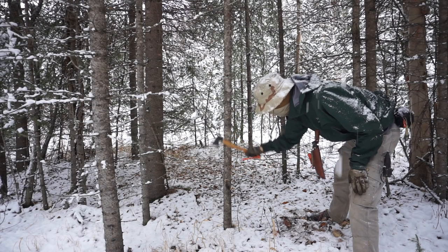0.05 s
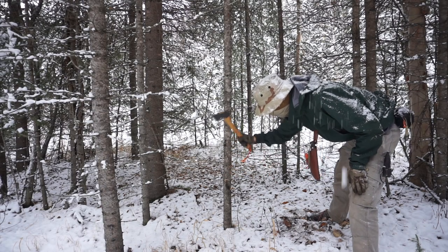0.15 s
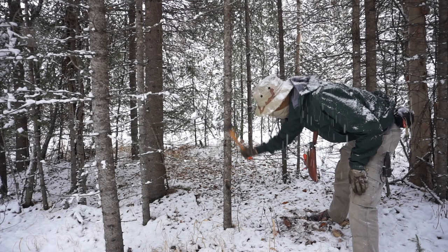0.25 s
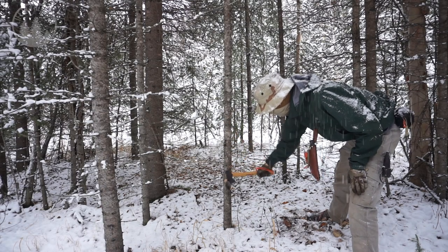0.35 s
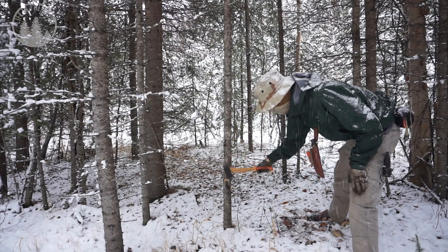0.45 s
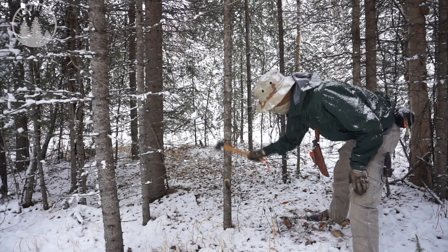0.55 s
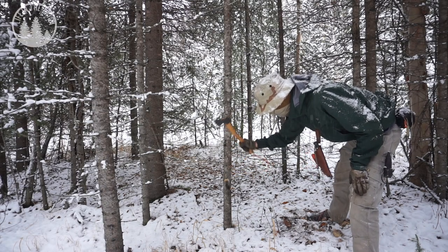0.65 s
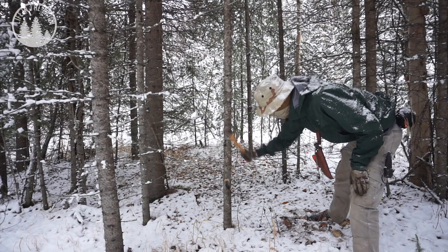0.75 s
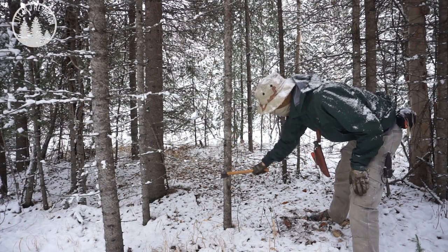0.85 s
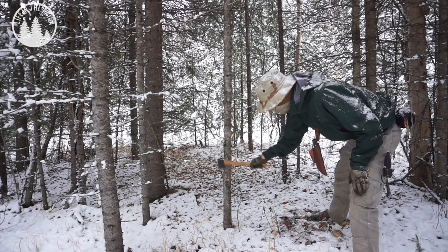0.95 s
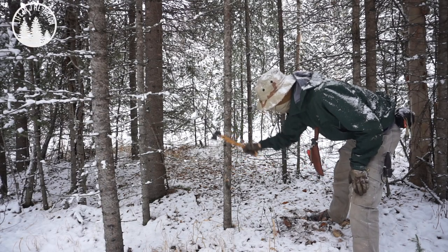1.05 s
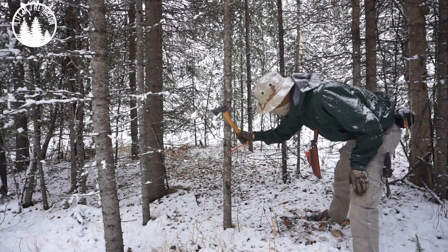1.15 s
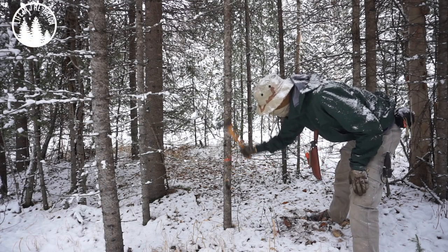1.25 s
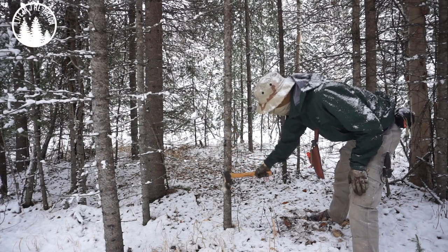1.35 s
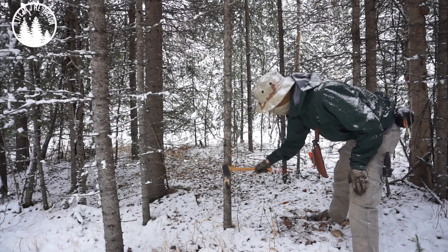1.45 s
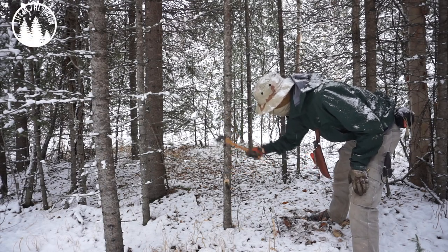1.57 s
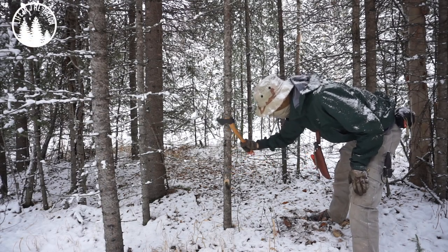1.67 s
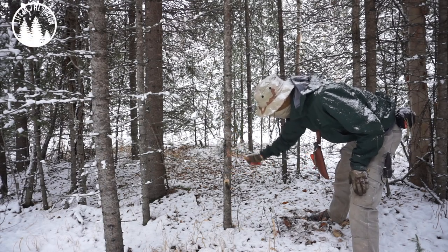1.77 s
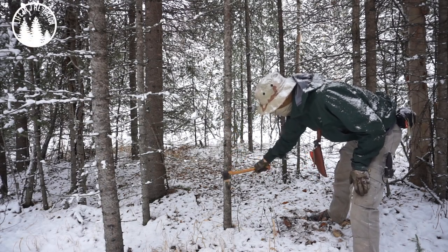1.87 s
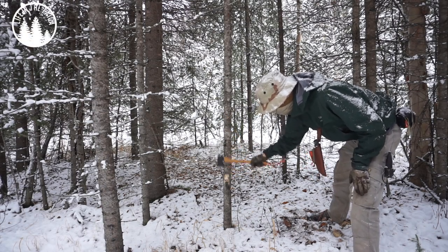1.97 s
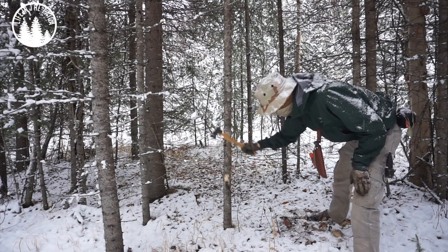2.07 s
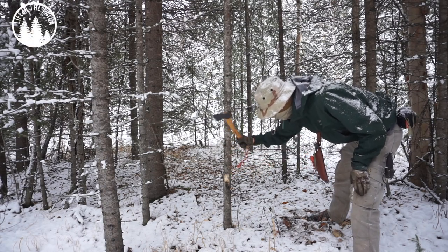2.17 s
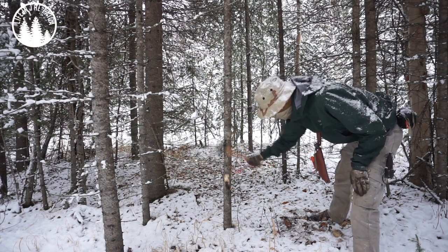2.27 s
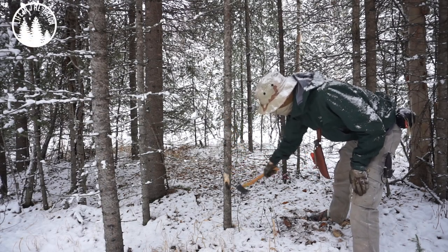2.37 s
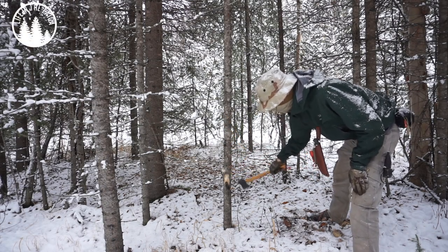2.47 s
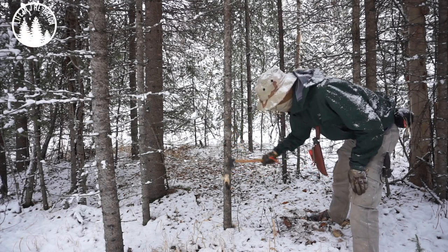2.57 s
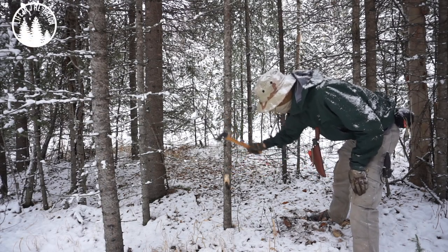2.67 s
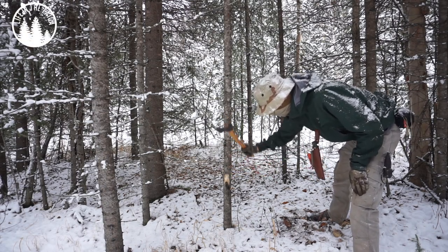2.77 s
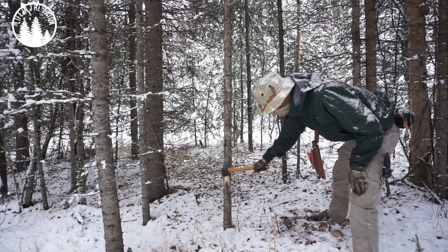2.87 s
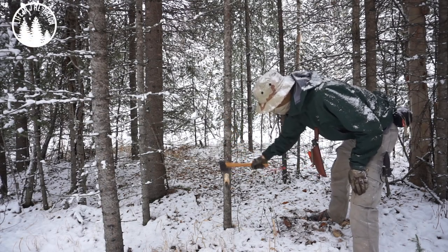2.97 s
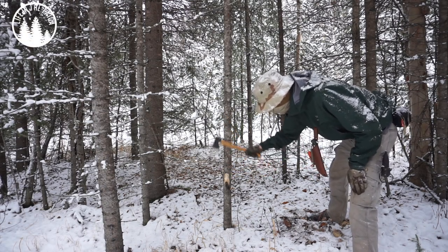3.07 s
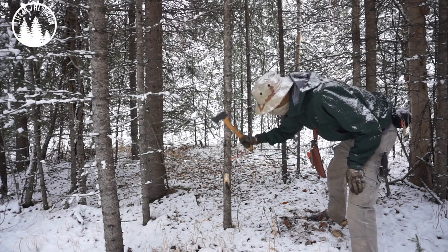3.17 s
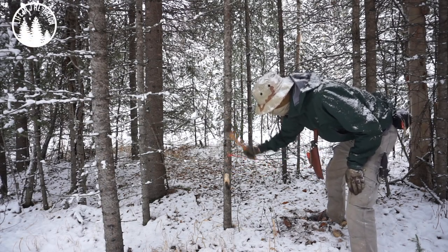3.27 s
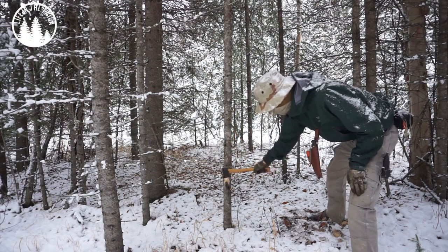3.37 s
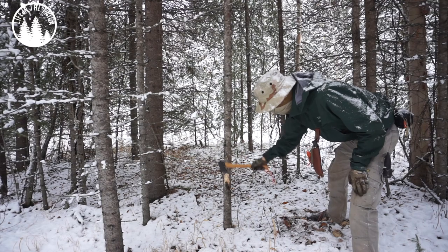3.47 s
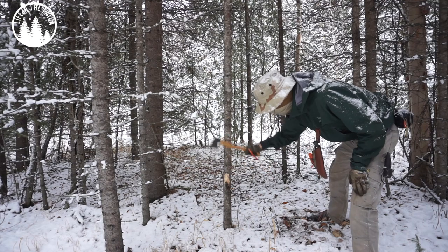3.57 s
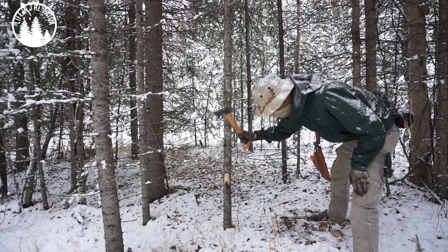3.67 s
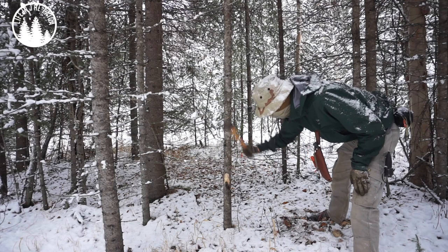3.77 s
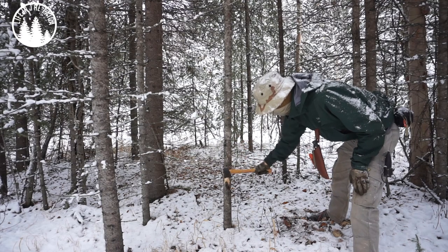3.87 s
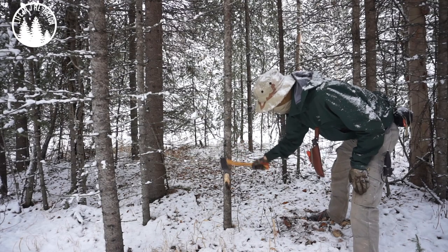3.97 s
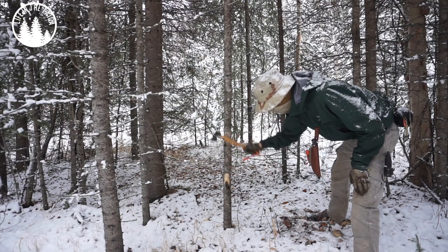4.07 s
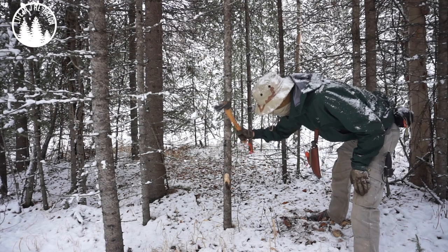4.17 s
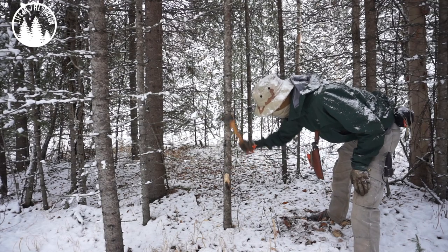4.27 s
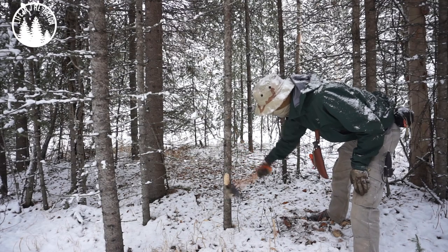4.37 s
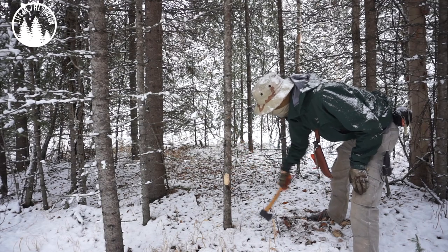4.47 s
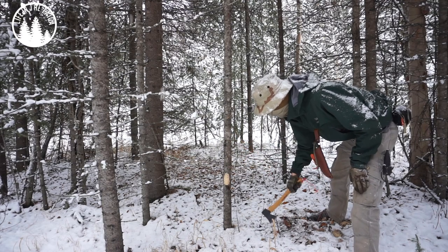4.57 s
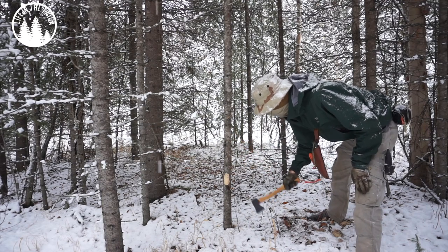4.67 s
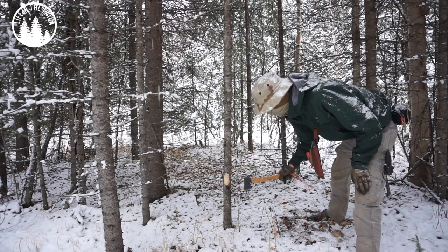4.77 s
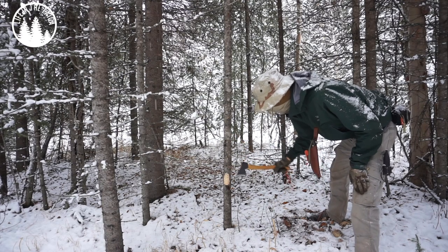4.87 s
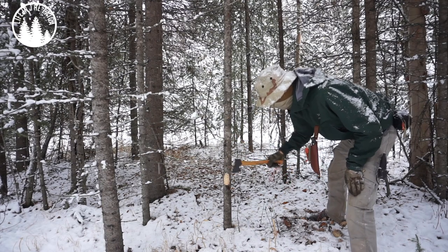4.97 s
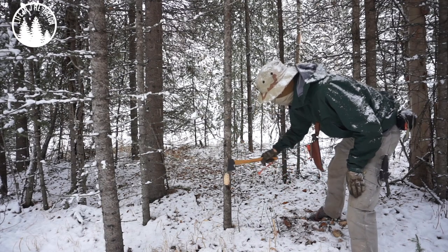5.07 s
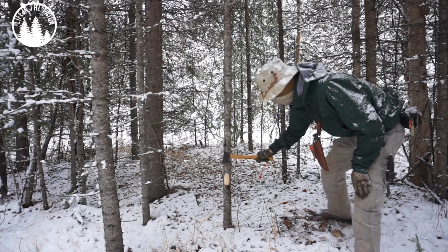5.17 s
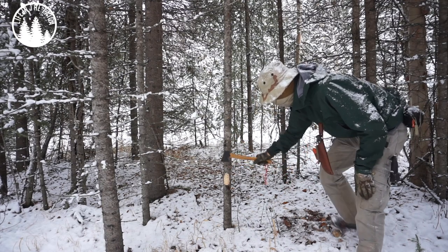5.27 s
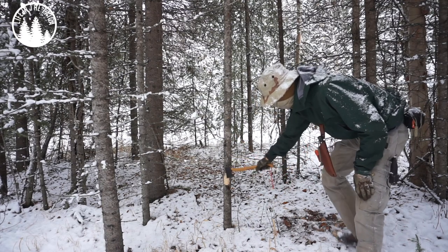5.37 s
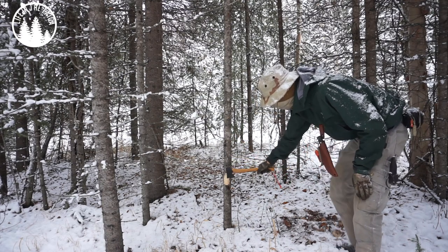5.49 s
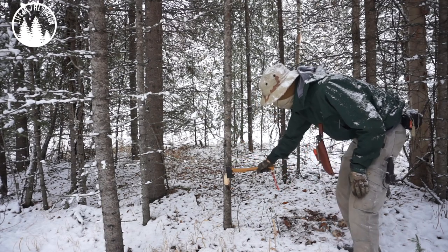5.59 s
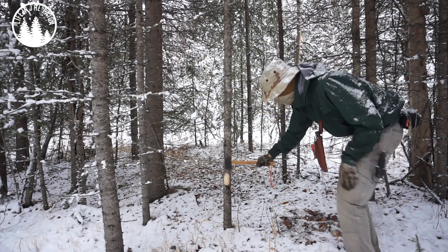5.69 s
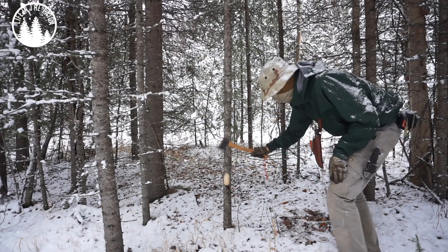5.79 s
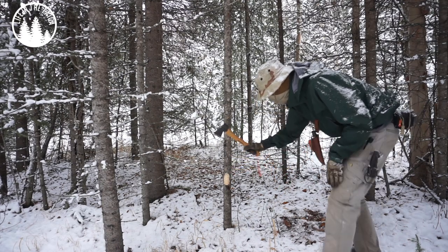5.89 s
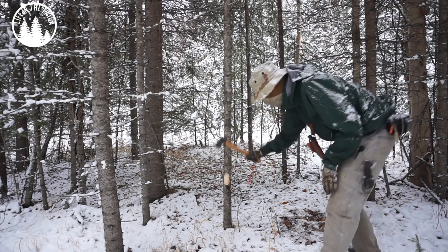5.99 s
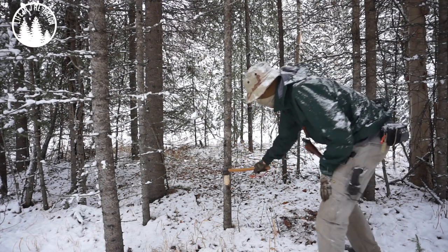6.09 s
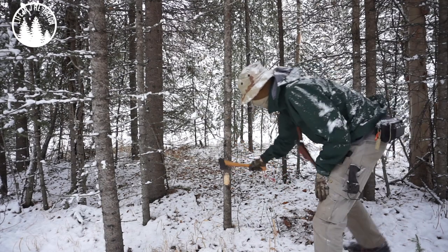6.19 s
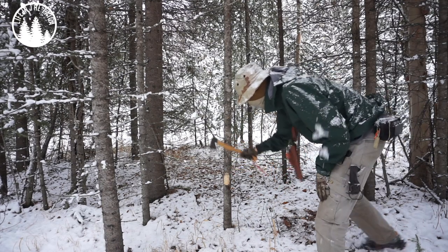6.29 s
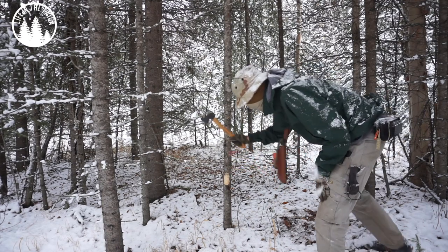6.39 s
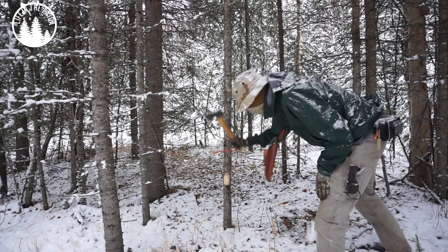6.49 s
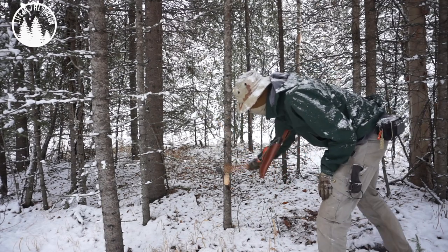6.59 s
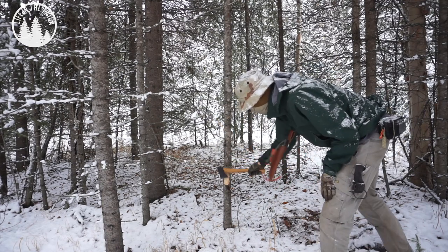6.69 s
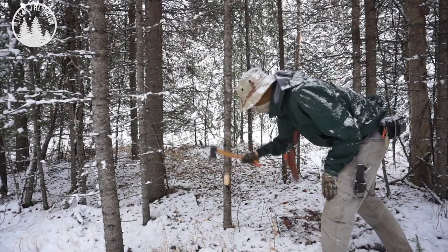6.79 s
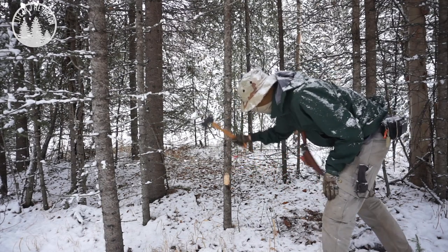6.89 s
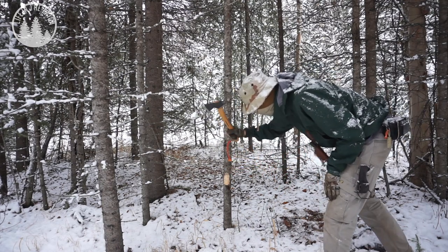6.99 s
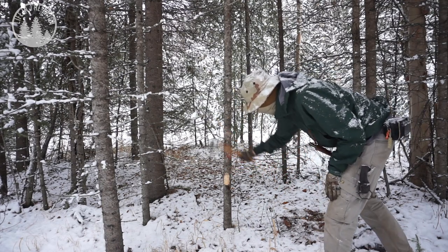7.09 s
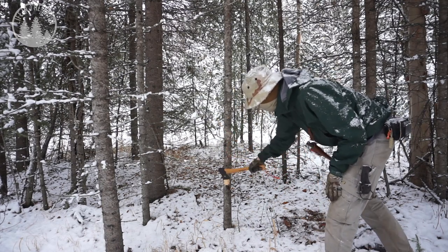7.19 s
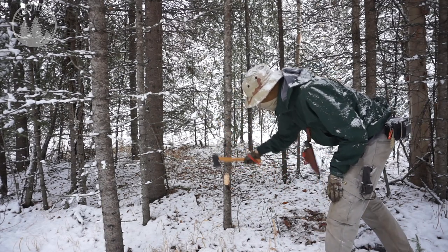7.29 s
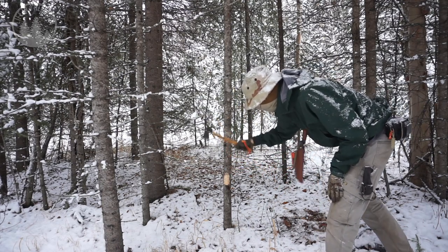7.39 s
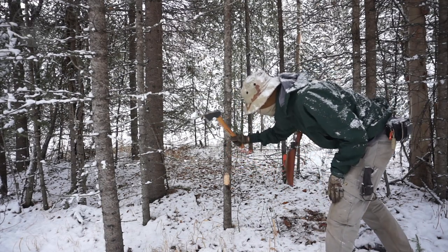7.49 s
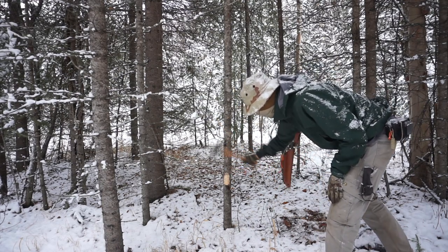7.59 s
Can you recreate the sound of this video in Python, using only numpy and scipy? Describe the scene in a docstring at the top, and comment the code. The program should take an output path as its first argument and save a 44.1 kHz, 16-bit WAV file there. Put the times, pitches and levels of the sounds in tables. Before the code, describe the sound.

Close stereo pickup of outdoor chopping: ten steady, sharp hatchet hits on a slender standing tree, splintering and knocking, each answered by a short wide echo from the trees. Light sleeve rubs and tiny falling chips fill the gaps above quiet distant water. The rhythm then breaks for cloth rustle, a glancing scrape-like crack and dull footfalls in snow, before three slower, firm blows finish.

```python
"""In a snowy forest, a hatchet chops a thin standing trunk about twice a second, with a river far off.
Each blow tears fibres, rings the wood and steel and shakes the stem; then the trees echo it.
Chips tick down after each blow, and the sleeve rubs before it and sometimes after it.
Past 4.5 s the blows come more slowly: one skids along the trunk while the jacket rustles and boots
thud and crunch in the snow, then three more bite. The wood is filtered crackle, the river is noise."""
import sys
import numpy as np
from scipy import signal
from scipy.fft import rfft, irfft
from scipy.io import wavfile
from scipy.ndimage import uniform_filter1d

SR = 44100
rng = np.random.default_rng(int(sys.argv[2]) if len(sys.argv) > 2 else 0)


def transcribe(u):
    """Save the signal u as a 16-bit wav file named by the first command-line argument.

    u: samples, shape (n,) or (channels, n), limited to [-1, 1]; the rate is SR.
    q: integer samples, one column per channel.
    """
    v = np.clip(np.atleast_2d(u).T, -1, 1)
    q = np.round(v * 32767).astype(np.int16)
    wavfile.write(sys.argv[1], SR, q)


N = 336924  # length of the scene in samples
HZ = np.fft.rfftfreq(4096, 1 / SR)  # frequencies on which filters are drawn
T = np.arange(SR // 2) / SR  # half a second of time, for short sounds

# Bites of the blade. Each row: start in seconds, length in seconds, strength in dB, woody knock in dB
# over the strength, edge brightness in dB over the strength, main splinter in Hz, its lift in dB,
# lesser splinter in Hz, stem shake in dB.
CHOPS = [ (-.085, 0.0035, 6, -7, -4, 3800, 6, 2210, -1.5),
         (.4185, 0.0059, 8, -11.5, -0.5, 4150, 7, 2400, -1),
         (.9150, .0041, 5.5, 0, -1.5, 2045, 11, 2960, -1.5),
         (1.4190, 0.0022, 0.5, 3, 4.5, 2870, 12, 5000, 1.5),
         (1.4252, 0.0052, 4.5, 1.5, 3, 3050, 16, 1080, 4), (1.9030, 0.0033, 6.5, 0, 0, 2090, 10, 940, -2),
         (2.4043, .0026, 6.5, -1.5, 1, 3250, 5.5, 1720, -7), (2.4102, .0038, -5, 3, 1.5, 5960, 12, 1110, 0),
         (2.9567, 0.0046, 5, -2.5, -0.5, 1380, 10, 3340, -4.5),
         (3.4356, .0057, 4.5, 2, -0.5, 3330, 7, 1130, -.5),
         (3.9386, 0.00297, 6.5, -1, -1.5, 2700, 8.5, 1500, -.5),
         (4.443, 0.0094, 8.5, 0.5, 1.5, 2900, 7.5, 1000, -4), (5.4618, .018, -2, 8, 11.5, 3030, 19, 653, 0),
         (6.1523, .0042, 4.5, 1, 3, 3530, 14.5, 940, 0), (6.7011, 0.003, 4.5, 2.5, -2, 9460, 14.5, 1250, 3),
         (7.232, 0.0049, 8, -4, -6.5, 4200, 2, 1590, 1)]
# Resonances of the notch in the trunk. Each row: pitch in Hz, width in Hz, lift in dB.
NOTCH = [(226, 140, 12), (412, 120, 9), (547, 55, 5), (784, 104, 10.5), (918, 63, 7), (1103, 85, 6.5),
         (1240, 54, 6), (1557, 51, 6.5), (1880, 300, 5), (2230, 116, 6), (3400, 110, 0)]
# Basic tone of a bite. Each row: frequency in Hz, level in dB.
BITE_TONE = [(40, -14), (130, -12.5), (320, -19), (600, -1.5), (900, -4), (2000, -4), (4000, 1.5),
             (6000, -3.5), (10000, -2.5), (15000, -4.5)]
# Bending of the whole stem. Each row: pitch in Hz, level in dB before the blow's stem shake,
# time to fade by 60 dB in seconds.
STEM = [(50.7, -38, 0.45), (61, -50.5, .3), (72.7, -44.5, 0.64), (92, -46.5, 0.17), (93.9, -37.5, 0.41),
        (115.5, -49.5, 0.52), (121.4, -56.5, 0.27), (145.4, -50.5, 0.34), (206.5, -38.5, 0.056),
        (246, -44.5, 0.11)]
# Ringing of the steel head. Each row: pitch in Hz, level in dB before the blow's steel level,
# time to fade by 60 dB in seconds.
STEEL = [(4100, -19, .05), (5770, -8, 0.17), (7160, -19, 0.2), (10000, 1, 0.12), (11050, -20, .1),
         (12285, -13, 0.19)]
# How long the forest echoes. Each row: frequency in Hz, time to fade by 60 dB in seconds.
FOREST_T60 = [(100, .3), (500, 0.55), (1500, 0.66), (3500, 0.52), (7000, 0.49), (15000, 0.6)]
# Tone of the forest echo. Each row: frequency in Hz, relative level in dB.
FOREST_TONE = [(100, 19), (350, -16.5), (800, -5), (1500, 0), (3500, -4.5), (7000, -3.5), (15000, -4)]
# How alike the echo is on both sides. Each row: frequency in Hz, left-right likeness (1 is the same).
FOREST_SAME = [(200, 1), (600, 1), (1200, 0.61), (2200, 0.31), (6000, 0.027), (15000, 0.064)]
# Where nearby sounds sit. Each row: frequency in Hz, left level minus right level in dB.
NEAR_PAN = [(200, -0.9), (1200, -4.5), (2300, -5), (3400, -3), (4500, -1), (6000, 2), (9000, -0.5),
            (15000, 0)]
# How alike nearby sounds are on both sides. Each row: frequency in Hz, left-right likeness.
NEAR_SAME = [(200, 1), (1500, 0.86), (4000, 0.91), (8000, 0.9), (15000, .86)]
# Loudest ticks of chips, twigs and the blade working loose. Each row: start in seconds,
# starting level in dB, fade in seconds, centre in Hz.
TICKS = [(0.892, -42.5, .0026, 1390), (0.968, -29, 0.0012, 5400), (1.609, -40.5, 0.0039, 3920),
         (1.6536, -36, 0.011, 3530), (1.7232, -42, 0.022, 3915), (1.938, -27.5, 0.0023, 5000),
         (2.01, -30, 0.0014, 5030), (2.1503, -38.5, 0.0052, 3260), (2.2857, -33, 0.0043, 3400),
         (2.526, -39.5, 0.0079, 6000), (3.0605, -39.5, 0.014, 3950), (3.9024, -35, 0.002, 2410),
         (4.144, -38, 0.0038, 6200), (4.562, -38.5, 0.009, 5400), (4.624, -42, 0.02, 4940),
         (5.321, -38, .015, 4100), (5.7348, -29, 0.0033, 1400), (5.7716, -53, .002, 2530),
         (7.305, -29, 0.0021, 3580)]
# Dull thuds of boots and swinging gear. Each row: start in seconds, level in dB,
# snow crunch in dB over that level, centre in Hz.
THUDS = [(5.472, -49.5, 9.5, 184), (5.603, -48, 2, 152), (5.643, -49, -1.5, 120), (5.737, -32.5, -2, 121),
         (5.773, -43, 2, 230), (6.094, -33.5, -4, 200), (6.122, -40, 4.5, 253), (6.25, -45.5, 4, 188),
         (6.565, -42, -5, 234), (6.589, -43, -5, 119), (7.106, -36.5, -10.5, 101), (7.157, -39, -8.5, 141),
         (7.548, -35.5, -9, 114)]
# Tone of rubbing cloth. Each row: frequency in Hz, relative level in dB.
CLOTH = [(200, -50), (700, 1), (1500, -2.5), (3300, 4.5), (5000, 1.5), (7000, -2), (11000, -3), (15000, -1)]
# Tone of crunching snow. Each row: frequency in Hz, relative level in dB.
SNOW = [(30, -17), (80, -3), (250, 0.5), (600, -1), (1200, -13.5), (3000, -13), (15000, -56)]
# The jacket rubs as the body rises and takes two steps: one curve a move.
# Each row of a curve: time in seconds, level of the hiss in dB before MOVE_DB.
MOVES = [
    [(5.14, -58.5), (5.254, -39), (5.27, -45.5), (5.312, -47.5), (5.322, -39), (5.358, -47), (5.45, -50)],
    [(5.52, -59), (5.558, -43), (5.674, -65), (5.744, -48), (6.002, -54.5), (6.08, -41.5), (6.14, -46)],
    [(6.22, -52.5), (6.398, -51.5), (6.488, -44), (6.518, -44.5), (6.524, -48.5), (6.672, -62.5),
     (6.69, -53)],
]
# The sleeve rubs as the arm pulls back. Each row: peak time in seconds, level in dB.
TUGS = [(1.668, -45.5), (2.18, -49), (2.303, -49), (2.898, -51)]
# Tone of the river. Each row: frequency in Hz, relative level in dB per Hz.
RIVER_TONE = [(25, -5), (50, -10), (86, -11), (160, -11.5), (340, -7), (450, -8.5), (640, -4), (1000, -6.5),
              (2000, -7.5), (3600, -12.5), (7000, -14.5), (15800, -13)]
# How alike the river is on both sides. Each row: frequency in Hz, left-right likeness.
RIVER_SAME = [(60, 0.93), (150, 0.27), (380, 0.28), (950, -0.094), (2380, 0.11), (5980, -0.17),
              (15000, -0.25)]

SNAP_SHARE, SNAP_SIZE = 0.3286, 3.  # the hardest snap: how far into the bite, and its size
LESSER_LIFT_DB = 6  # how far the lesser splinter's resonance stands out
# a bite longer than GLANCE_S skids along the trunk; the change is smooth over about GLANCE_WIDTH_S
GLANCE_S, GLANCE_WIDTH_S = 0.0063, 0.00061
BURIED_DB, GLANCING_DB = -60, -41  # steel ring over the strength: buried in wood, and skidding free
SAME_BLOW_S = .02  # bites closer than this belong to one swing
OUTWARD_DB, OUTWARD_LENGTH_DB_PER_S = 3., -350  # sound sent into the trees; a long skid sends less
FAR_SHARE = .6  # share of the resonances that reaches the trees
DEBRIS_DELAY_S, DEBRIS_SPAN_S = 0.087, .38  # small chips land in this stretch after each bite
DEBRIS_DB, DEBRIS_SPREAD_DB = -48.5, 3.5  # their usual starting level and how much it varies
DEBRIS_FADE_S, DEBRIS_HZ, DEBRIS_OCTAVES = 0.0051, 4200, 0.9  # their fade, centre pitch and its spread
LITTER_DB, LITTER_FADE_S = -52, 0.0029  # usual starting level and fade of needles and snow crumbs
THUD_FADE_S = .012
SWING_LEAD_S, SWING_HALF_S, SWING_DB = 0.036, 0.058, -60.5  # the sleeve swishes ahead of every blow
TUG_HALF_S = 0.037
MOVE_DB, MOVE_FADE_S = 2.5, 0.033  # gain on the moves; each swells in and dies away this fast
SCUFF_DB = -16.5  # low scuff that goes with all movement, relative to the hiss
PACK_LAG_S, PACK_HALF_S, PACK_DB = 0.017, 0.038, -19  # snow packs after a thud, relative to its crunch
RIVER_DB = -52
EDGE_HZ, CEILING = 15950, .6  # microphone: upper band limit, and the level that peaks cannot pass


def hatchet(bark_db=-9.5, bark_s=0.0022, beam_hz=9050.0):
    """Every blow: bark crushed, the bite, the ring of the head, the stem's shudder, the forest's answer."""
    out = np.zeros((2, N))
    for s, length, db, knock_db, edge_db, hz, lift_db, lesser_hz, stem_db in CHOPS:
        shape = (SNAP_SHARE, db + knock_db, db, db + edge_db, hz, lift_db, lesser_hz, LESSER_LIFT_DB)
        glancing = (1 + np.tanh((length - GLANCE_S) / GLANCE_WIDTH_S)) / 2  # 0 buried, 1 skidding
        steel_db = db + BURIED_DB + glancing * (GLANCING_DB - BURIED_DB)
        blow = np.zeros(len(T))
        add(blow, 0, bite(length, *shape))
        add(blow, length, amp(steel_db) * ring(STEEL, 0.00042, 0.0023))
        add(out, s - bark_s, near(amp(bark_db) * bark()))  # the edge breaks the bark just before the wood
        add(out, s, near(blow))
        add(out, s, amp(stem_db) * ring(STEM, 0.0035, 0.0068))
        # a double bite shares one swing's energy
        bites = sum(abs(row[0] - s) < SAME_BLOW_S for row in CHOPS)
        outward_db = OUTWARD_DB + OUTWARD_LENGTH_DB_PER_S * length
        for _ in range(2):  # the echo is fed by two fresh, less resonant cracks, which evens its tone
            outward = bite(length, *shape, share=FAR_SHARE, beam_hz=beam_hz)
            outward = outward / np.linalg.norm(outward) / np.sqrt(2 * bites)
            add(out, s, amp(outward_db) * forest(outward))
    return out


def bark():
    """Bark gives way in a brief swell of tiny fractures."""
    crushing = np.exp(-((T[:4096] - .002) / 0.0015) ** 2)
    return colour(crackle(crushing), read(BITE_TONE, HZ))


def bite(length, snap, body_db, middle_db, edge_db, hz1, db1, hz2, db2, share=1, beam_hz=np.inf,
         after=0.063, after_s=0.0037, push_hz=1000.0, push_db=0., push_at=0.702, splinter_width=0.16):
    """Fibres tear while the blade sinks in and one snaps hard; the blade also shoves the wood."""
    t = T[:2 * (len(HZ) - 1)]
    settling = after * np.exp(-abs(t - length) / after_s)
    sinking = np.minimum(t / 0.00046, 1) * np.where(t < length, 1, settling)
    snapping = SNAP_SIZE * np.exp(-((t - snap * length) / 0.00014) ** 2)
    tearing = crackle(sinking + snapping)
    shove = amp(push_db) * np.sinc((t - push_at * length) * SR)  # a single click
    # tearing supplies the treble, the shove the woody knock
    treble = signal.sosfilt(signal.butter(2, push_hz, "high", fs=SR, output="sos"), tearing)
    knock = signal.sosfilt(signal.butter(2, push_hz, fs=SR, output="sos"), shove)
    balance = [(950, body_db), (1600, middle_db), (4200, middle_db), (7000, edge_db)]
    tone = read(balance, HZ) + read(BITE_TONE, HZ)
    # splinters above beam_hz radiate in a narrow beam and send little into the forest
    splinters = [(hz, splinter_width * hz, db / (1 + (hz / beam_hz) ** 2))
                 for hz, db in [(hz1, db1), (hz2, db2)]]
    resonances = sum(lift(*resonance) for resonance in NOTCH + splinters)
    return colour(treble + knock, tone + share * resonances)


def lift(hz, width, db):
    """One resonance as a bump in dB."""
    return db / (1 + ((HZ - hz) / (width / 2)) ** 2)


def ring(modes, rise_s, spread):
    """Each way of vibrating is a dying tone, nudged in pitch; neighbours swing in opposite directions."""
    total = np.zeros(len(T))
    for k, (hz, db, t60) in enumerate(modes):
        nudged_hz = hz * (1 + spread * rng.standard_normal())
        total += (-1) ** k * amp(db - 60 * T / t60) * np.sin(2 * np.pi * nudged_hz * T)
    return total * (1 - np.exp(-T / rise_s))


def forest(x, near_db=3.5, near_s=0.0075, patchy_db=1.5, hold_s=0.026, spread_db=3.5):
    """Echoes from ground and nearest trunks hold briefly, then fade among ever farther trees."""
    taps = pair(grains(len(T), spread_db), grains(len(T), spread_db), FOREST_SAME, FOREST_TONE)
    hz, t, z = signal.stft(taps, SR, nperseg=256)
    clumps_db = patchy_db * rng.standard_normal(len(t))
    fading_s = np.hypot(t, hold_s) - hold_s  # starts slowly, hence the hold
    fading_db = 60 * fading_s / read(FOREST_T60, hz)[:, None]
    tail = signal.istft(z * amp(clumps_db - fading_db), SR, nperseg=256)[1][:, :len(T)]
    tail *= np.clip((T - .002) / 0.00042, 0, 1)  # silent until the first echo
    tail *= 1 + amp(near_db) * np.exp(-T / near_s)  # nearest echoes are stronger
    return signal.fftconvolve(x[None], tail * amp(-34.5), axes=1)


def near(x):
    """Direct sound at two microphones; a little scatter makes the sides differ."""
    scatter = crackle(np.exp(-T[:512] / .001))
    both = pair(x, signal.fftconvolve(x, scatter)[:len(x)], NEAR_SAME)
    pan_db = read(NEAR_PAN, np.fft.rfftfreq(len(x), 1 / SR))
    return irfft(rfft(both) * amp([pan_db / 2, -pan_db / 2]), len(x))


def chips(octave_db=4.0, forest_db=-1.0):
    """Short dry crackles of bark and chips, each with its own brightness and forest echo."""
    out = np.zeros((2, N))
    for s, db, fade, hz in TICKS + debris() + litter():
        octaves = np.log2((HZ + 1) / hz)
        tone = -octave_db * np.minimum(np.hypot(octaves, .5), 5)  # falls away on both sides of the centre
        tick = amp(db) * evened(colour(grains(len(T), 5.3), tone)) * np.exp(-T / fade)
        add(out, s, near(tick))
        add(out, s, amp(forest_db) * forest(tick))
    return out


def debris(count=2):
    """Small chips land at random after every bite; rows like those of TICKS."""
    rows = []
    for s, *_ in CHOPS:
        for _ in range(count):
            flight = DEBRIS_DELAY_S + DEBRIS_SPAN_S * rng.random()
            size, pitch = rng.standard_normal(2)
            hz = DEBRIS_HZ * 2 ** (DEBRIS_OCTAVES * pitch)
            rows.append((s + flight, DEBRIS_DB + DEBRIS_SPREAD_DB * size, DEBRIS_FADE_S, hz))
    return rows


def litter(count=18):
    """Faint ticks of needles and crumbs of snow dropping at any time; rows like those of TICKS."""
    times = rng.random(count) * N / SR
    sizes, pitches = rng.standard_normal((2, count))
    levels = LITTER_DB + DEBRIS_SPREAD_DB * sizes
    centres = DEBRIS_HZ * 2 ** (DEBRIS_OCTAVES * pitches)
    return [(s, db, LITTER_FADE_S, hz) for s, db, hz in zip(times, levels, centres)]


def thuds(sag=0.73):
    """A soft low push that sinks in pitch, with snow packing under it."""
    out = np.zeros(N)
    fading = np.exp(-T / THUD_FADE_S)
    for s, db, crunch_db, hz in THUDS:
        sinking_hz = hz * (1 + sag * fading - sag / 2)
        push = np.sin(2 * np.pi * np.cumsum(sinking_hz) / SR)
        crunch = evened(colour(grains(len(T), 7.1), read(SNOW, HZ)))
        swell = 2 * fading * (1 - np.exp(-T / 0.00096))
        add(out, s, amp(db) * (push + amp(crunch_db) * crunch) * swell)
    return near(out)


def rustles(flutter_db=2.0, crinkle_db=3.0, crunch_db=8.0, lumps_db=4.):
    """Sleeves hiss and boots scuff as the body swings and shifts; the snow gives way in lumps."""
    hiss, scuff = movement()
    catching = amp(flutter_db * evened(uniform_filter1d(rng.standard_normal(N), 300)))
    cloth_same = [(500, 0.64), (3000, 0.091), (12000, 0.043)]  # Hz, left-right likeness
    cloth = evened(pair(grains(N, crinkle_db), grains(N, crinkle_db), cloth_same, CLOTH))
    snow = evened(pair(grains(N, crunch_db), grains(N, crunch_db), NEAR_SAME, SNOW))
    giving = evened(amp(lumps_db * evened(uniform_filter1d(rng.standard_normal(N), size=600))))
    return catching * (hiss * cloth + scuff * giving * snow)


def movement():
    """Levels of cloth hiss and snow scuff, from the swings, tugs, body moves and footfalls."""
    t = np.arange(N) / SR

    def stroke(s, half):
        """One smooth rub that peaks at time s."""
        return np.exp(-((t - s) / half) ** 2 / 2)

    swings = [stroke(s - SWING_LEAD_S, SWING_HALF_S) for s, *_ in CHOPS]
    hiss = amp(SWING_DB) * np.max(swings, axis=0)
    hiss += sum(amp(db) * stroke(s, TUG_HALF_S) for s, db in TUGS)
    for move in MOVES:
        times, db = np.transpose(move)
        inside = stroke(np.clip(t, times[0], times[-1]), MOVE_FADE_S)  # full during the move, fading outside
        hiss += amp(MOVE_DB + np.interp(t, times, db)) * inside
    packing = sum(amp(PACK_DB + db + crunch_db) * stroke(s + PACK_LAG_S, PACK_HALF_S)
                  for s, db, crunch_db, _ in THUDS)
    return hiss, amp(SCUFF_DB) * hiss + packing


def river(patchy_db=3.0, smooth_hz=3000.):
    """Distant water is noise that wavers in small patches; the fine hiss on top stays more even."""
    water = pair(*rng.standard_normal((2, N)), RIVER_SAME, RIVER_TONE)
    hz, _, z = signal.stft(water, SR, nperseg=1024)
    patches = uniform_filter1d(rng.standard_normal(z.shape[1:]), size=8, axis=0)
    patches = evened(uniform_filter1d(patches, size=8, axis=1))
    z = z * amp(patchy_db * patches / (1 + (hz[:, None] / smooth_hz) ** 2))
    return amp(RIVER_DB) * evened(signal.istft(z, SR, nperseg=1024)[1][:, :N])


def amp(db):
    """Decibels to gain."""
    return 10 ** (np.asarray(db) / 20)


def evened(x):
    """Scales to an rms (average strength) of 1."""
    return x / np.sqrt(np.mean(x ** 2) + 1e-20)


def read(points, hz):
    """A table's value at the given frequencies, on a log-frequency axis."""
    f, value = np.transpose(points)
    return np.interp(np.log(hz + 1), np.log(f + 1), value)


def add(mix, s, sound):
    """Mixes a sound in at time s, which may lie before zero."""
    start = round(s * SR)
    part = mix[..., max(start, 0):]
    heard = sound[..., max(-start, 0):][..., :part.shape[-1]]
    part[..., :heard.shape[-1]] += heard


def colour(x, db):
    """Filters with the given gain on the HZ grid, without any sound ahead of its cause."""
    cepstrum = irfft(np.log(amp(db)))
    # folding the cepstrum forward gives a minimum-phase filter
    cepstrum[1:len(HZ) - 1] *= 2
    cepstrum[len(HZ):] = 0
    return signal.fftconvolve(x, irfft(np.exp(rfft(cepstrum))))[:len(x)]


def pair(a, b, likeness, level=((1, 0), (2, 0))):
    """Two unrelated sounds become a left and right of given likeness and tone."""
    hz = np.fft.rfftfreq(len(a), 1 / SR)
    same = np.clip(read(likeness, hz), -1, 1)
    mid = rfft(a) * np.sqrt((1 + same) / 2)
    side = rfft(b) * np.sqrt((1 - same) / 2)
    return irfft(np.array([mid + side, mid - side]) * amp(read(level, hz)), len(a))


def grains(size, spread_db):
    """Noise made of tiny clicks of uneven size."""
    uneven_db = spread_db * np.minimum(rng.exponential(1, size), 5)
    return evened(rng.standard_normal(size) * amp(uneven_db))


def crackle(envelope):
    """A burst of tiny fractures of energy 1, with a ragged spectrum free of deep holes."""
    x = envelope * grains(len(envelope), 3.8)
    for _ in range(2):  # flatten the spectrum, then reshape in time
        z = rfft(x)
        x = irfft(z / np.sqrt(abs(z) + 1e-9)) * np.sqrt(np.minimum(envelope, 1))
    return x / np.linalg.norm(x)


def scene():
    """All sources together."""
    return hatchet() + chips() + thuds() + rustles() + river()


def record(dry, low_cut_hz=36):
    """The microphone sheds deep bass, rounds the highest peaks and ends at its band limit."""
    thinned = signal.sosfilt(signal.butter(4, low_cut_hz, "high", fs=SR, output="sos"), dry)
    rounded = CEILING * np.tanh(thinned / CEILING)
    band_limit = signal.firwin(511, EDGE_HZ, window=("kaiser", 9), fs=SR)
    return signal.oaconvolve(rounded, band_limit[None], "same")


dry = scene()
out = record(dry)
transcribe(out)
```